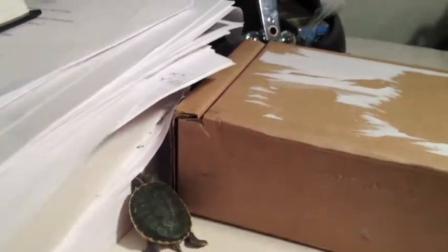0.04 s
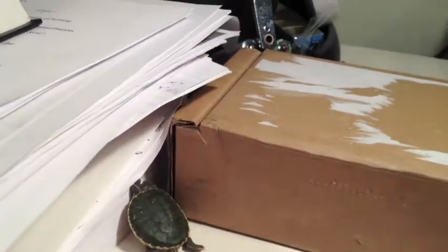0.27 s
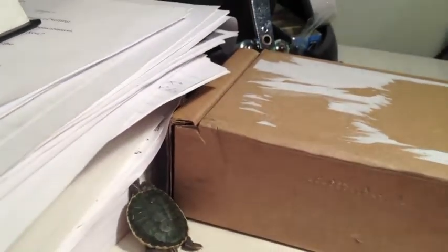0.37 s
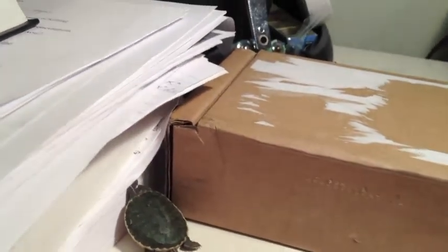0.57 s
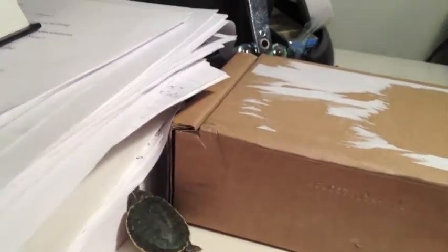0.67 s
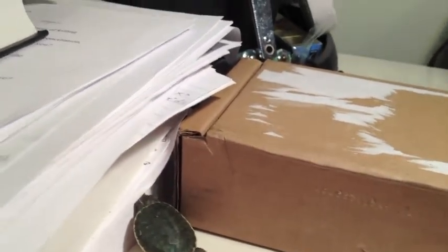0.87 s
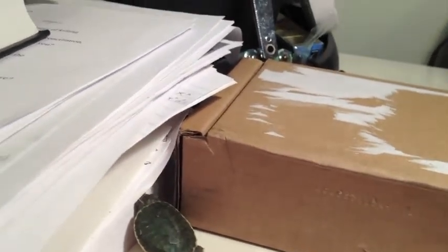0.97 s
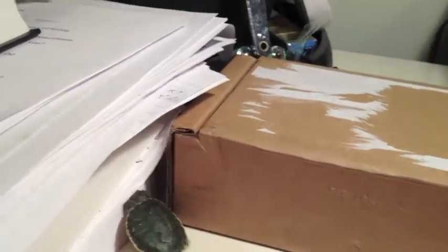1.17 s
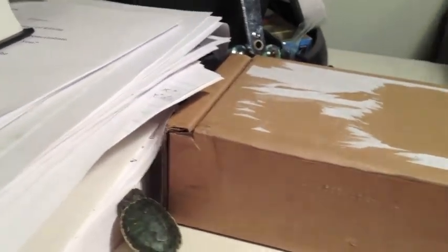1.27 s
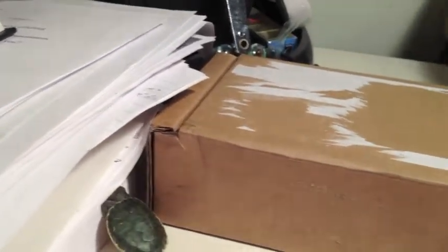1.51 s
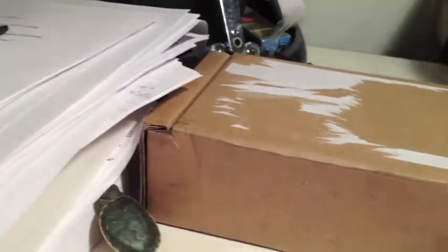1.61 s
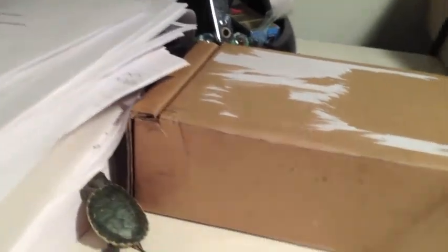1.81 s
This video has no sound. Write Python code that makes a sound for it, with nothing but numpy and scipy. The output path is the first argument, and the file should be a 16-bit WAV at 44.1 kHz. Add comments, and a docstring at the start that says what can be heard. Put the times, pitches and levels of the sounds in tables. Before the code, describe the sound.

A small turtle's shell knocks hollowly against a cardboard box and table, close by. After a brief paper rustle, quick knocks start at 0.2 seconds and tumble into a dull clatter with claw clicks and more rustling until about 0.6. From 0.8 a soft, gritty scrape swells, with light taps around 1.5 and a last bump near 1.75, over faint room air.

```python
"""A small turtle clambers between a cardboard box and a stack of paper on a table, close by in a small room.
Paper rustles first, a hiss full of tiny slips, over faint room air. The shell knocks three times, then
tumbles in a dull clatter that rings box and table, with dry claw taps and more rustle. A soft scrape
creeps in and swells under a few more taps until a last bump."""
import sys
import numpy as np
from scipy import signal
from scipy.fft import rfft, irfft
from scipy.io import wavfile

SR = 44100
rng = np.random.default_rng(int(sys.argv[2]) if len(sys.argv) > 2 else 0)


def transcribe(u):
    """Save the signal u as a 16-bit wav file named by the first command-line argument.

    u: samples, shape (n,) or (channels, n), limited to [-1, 1]; the rate is SR.
    q: integer samples, one column per channel.
    """
    v = np.clip(np.atleast_2d(u).T, -1, 1)
    q = np.round(v * 32767).astype(np.int16)
    wavfile.write(sys.argv[1], SR, q)


N = 81585


def undb(db):
    return 10 ** (np.asarray(db) / 20)


def unit_rms(x):
    return x / np.sqrt(np.mean(x ** 2) + 1e-20)


def curve_at(hz, points):
    """Read (f/Hz, value) breakpoints on a log-frequency axis."""
    freqs, values = np.array(points, float).T
    return np.interp(np.log(np.maximum(hz, 1)), np.log(freqs), values)


def equalise(x, eq):
    """Apply an EQ curve with a low cut below its first point, and normalise."""
    hz = np.arange(N // 2 + 1) * SR / N
    low_cut = np.minimum(hz / eq[0][0], 1) ** 2
    return unit_rms(irfft(rfft(x) * undb(curve_at(hz, eq)) * low_cut, N))


def decay(t, t60):
    """Exponential tail, 60 dB down at t60."""
    return np.exp(-np.log(1000) * t / t60)


def mix_in(out, start, x):
    i = int(start * SR)
    out[i:i + len(x)] += x[:N - i]


def fine_resonances(depth_db=7, spacing_hz=22.39):
    """An object's fine resonances: random peaks and dips in dB, one value per Hz."""
    return depth_db * np.interp(np.arange(SR // 2 + 1) / spacing_hz, np.arange(N), rng.standard_normal(N))


def box_hollowness(boost_db=4, width_hz=25):
    """Rubbing sounds the modes of box and table: a peak in dB at each, one value per Hz."""
    hz = np.arange(SR // 2 + 1)
    peaks = [1 / (1 + (2 * (hz - mode[0]) / width_hz) ** 2) for mode in BOX_TABLE_MODES]
    return boost_db * np.max(peaks, axis=0)


def friction(envelope, eq, grain_db, spread_db, grains_per_s=1500, catches_per_s=70):
    """Tiny slips of uneven size over a smooth hiss; louder and brighter with the pressure of the rub."""
    chance, size = rng.random(N), rng.exponential(size=N)
    direction, hiss = rng.standard_normal((2, N))
    grains = (chance < grains_per_s / SR) * np.sign(direction) * undb(spread_db * np.minimum(size, 3))
    texture = hiss + undb(grain_db) * unit_rms(grains)
    t = np.arange(N) / SR
    times, levels_db = np.array(envelope).T
    catch_db = np.interp(t * catches_per_s, np.arange(N), rng.standard_normal(N))  # catches and lets go
    pressure_db = np.interp(t, times, levels_db) + catch_db
    hz = np.arange(N // 2 + 1) * SR // N
    resonance_db = (0.35 * fine_resonances() + box_hollowness())[hz]
    rub = equalise(irfft(rfft(texture) * undb(resonance_db), N), eq)
    treble = irfft(rfft(rub) * (1 - np.exp(-(hz / 5960) ** 2)), N)
    treble_gain = undb(0.31 * (pressure_db - levels_db.max()))  # a lighter rub loses its top first
    return (rub - treble + treble * treble_gain) * undb(pressure_db)


# Envelope of the rub on paper: t/s, level/dB
PAPER_ENVELOPE = [(0, -43), (.065, -42.5), (.1, -51.5), (.118, -51), (.14, -61), (.2, -59.5), (.36, -73.5),
                  (.4, -40), (.47, -40), (.51, -46), (.54, -59), (.61, -56), (.66, -77)]
# Tone of the paper: f/Hz, level/dB
PAPER_EQ = [(100, -17), (160, -4), (800, 2.5), (1200, -5), (2400, 3), (3400, -2), (4300, -10), (5800, -14),
            (8000, -5.5), (9800, -14), (15000, -23.5)]


def paper_rustle():
    """The turtle brushes the paper stack: two short swishes of fine, even grain."""
    return friction(PAPER_ENVELOPE, PAPER_EQ, grain_db=-5.5, spread_db=4.5)


# Tone of the room air: f/Hz, level/dB
AIR_EQ = [(60, -26), (140, 0.5), (300, 1.5), (450, -4.5), (1000, -17.5), (3000, -24), (10000, -29.5),
          (15000, -31)]


def room_air():
    """A faint, dark bed of steady noise."""
    return undb(-62) * equalise(rng.standard_normal(N), AIR_EQ)


# Tone of the dense ring of cardboard and room: f/Hz, level/dB
CARDBOARD_EQ = [(110, -37.5), (150, -13.5), (400, -3), (800, -5.5), (1100, -12.5), (2000, -7.5),
                (3200, -6.5), (4200, -10), (5800, -17), (8400, -5.5), (9600, -19), (15000, -18)]
# Length of its tail: f/Hz, t60/s
CARDBOARD_T60 = [(150, 0.28), (700, 0.21), (2000, 0.2), (4500, 0.1), (8000, 0.054), (14000, 0.034)]


def cardboard_ring(t, strike_eq, resonance_db, attack_s=0.00024):
    """A crack of contact, then countless weak resonances excited at random; the high ones die first."""
    edges = np.geomspace(90, 16000, 17)
    hz = np.arange(len(t) // 2 + 1) * SR / len(t)
    tone = undb(curve_at(hz, CARDBOARD_EQ)) * (hz < edges[-1])
    tone = tone / np.linalg.norm(tone) * undb(curve_at(hz, strike_eq))
    spectrum = np.exp(2j * np.pi * rng.random(len(hz))) * tone * undb(resonance_db[hz.astype(int)])
    crack = undb(-9) * decay(t, t60=0.017)
    room_tail = undb(-29.5) * decay(t, t60=0.4)
    out = 0
    for lo, hi in zip(edges, edges[1:]):
        in_band = (hz >= lo) & (hz < hi)
        envelope = decay(t, curve_at(np.sqrt(lo * hi), CARDBOARD_T60)) + crack + room_tail
        band = irfft(spectrum * in_band, len(t)) * envelope
        out += band * np.linalg.norm(tone[in_band]) * np.linalg.norm(envelope) / np.linalg.norm(band)
    return out * (1 - np.exp(-t / attack_s))


def struck_mode(t, hz, t60, attack_cycles=1.6):
    """One mode: it builds over a few cycles, so low ones bloom late, then dies away."""
    return np.sin(2 * np.pi * hz * t) * (1 - np.exp(-t * hz / attack_cycles)) * decay(t, t60)


# Modes of box and table: f/Hz, level struck on the box side/dB, level struck on the table/dB, t60/s
BOX_TABLE_MODES = [(149.8, -0.5, -8.5, 0.16), (215.8, -14, -14, 0.53), (275.4, -12, -2.5, 0.2),
                   (296.7, 5, -15.5, 0.19), (439, -9, -11, .16), (388, -22, -14, 0.36),
                   (479.6, -5.5, 0.5, 0.18), (576.5, 1, -5.5, 0.15), (758.4, 4.5, -0.5, 0.11),
                   (787, -2.5, -17.5, 0.19), (821, -5.5, -8, 0.19), (1094, -19.5, -15.5, 0.27),
                   (1324, -9, -20, 0.16), (1380, -14, -11.5, 0.29), (1611, -15, -19, 0.23),
                   (1850, -19, -19, 0.15), (2157, -7, -25.5, .22), (2320, -10, -16.5, .11),
                   (2374, 4.5, -10, .13), (2549, -5, -9, 0.12), (3256, 0, -8.5, 0.092)]


def box_and_table(t, strike_eq, place):
    """The pitched body of a knock: shared modes, balanced by where the blow lands."""
    scatter_db = 2 * rng.standard_normal(len(BOX_TABLE_MODES))  # no two blows weight the modes alike
    out = 0
    for chance_db, (hz, box_db, table_db, t60) in zip(scatter_db, BOX_TABLE_MODES):
        place_db = np.interp(place, [0, 1], [box_db, table_db])
        out += undb(place_db + curve_at(hz, strike_eq) + chance_db) * struck_mode(t, hz, t60)
    return out


# Shell hits: t/s, bass/dB, body/dB, crack/dB, snap/dB, place (0 box side, 1 table), struck spot f/Hz
SHELL_HITS = [(.2129, -19.5, -14.5, -16.5, -15, 0.035, 800), (.2265, -40, -23.5, -14.5, -54, 0.5, 554),
              (.2405, -32, -20, -38.5, -55, 0.21, 770), (.2738, -28, -17, -21, -22.5, 0.58, 735),
              (.3394, -24, -18, -21.5, -19.5, 0.79, 680), (.3915, -35.5, -25, -61, -50, 1, 830),
              (.4045, -27.5, -17.5, -83, -34.5, .95, 586), (.4850, -19.5, -15.5, -24, -65, 0.75, 765),
              (.4920, -20.5, -17.5, -22.5, -48.5, 0.61, 818), (.5085, -54, -14, -40.5, -55, 0.53, 764)]
# Centres of the bass, body, crack and snap bands: f/Hz
HIT_BANDS = [250, 700, 2200, 8000]


def shell_knocks():
    """Each blow rings box, table and the patch under the shell, which gives it a pitch of its own."""
    out, t = np.zeros(N), np.arange(SR // 2) / SR
    resonance_db = fine_resonances()
    for start, *band_db, place, spot_hz in SHELL_HITS:
        strike_eq = list(zip(HIT_BANDS, band_db))
        modes = box_and_table(t, strike_eq, place)
        spot = undb(curve_at(spot_hz, strike_eq) - 4) * struck_mode(t, spot_hz, t60=0.047)
        mix_in(out, start, modes + spot + cardboard_ring(t, strike_eq, resonance_db))
    return undb(-2.5) * out


# Taps and thuds of claws and shell: t/s, level/dB, f/Hz, t60/s
TAP_HITS = [(.3914, -9.5, 666, 0.016), (.3952, -15.5, 860, 0.014), (0.4239, -1, 1760, 0.0036),
            (.4250, -11, 3015, 0.0048), (.4738, -11.5, 1900, 0.0038), (.5110, -13.5, 514.6, 0.076),
            (1.4135, -31.5, 640, 0.024), (1.484, -39.5, 199, 0.099), (1.53, -31.5, 187, 0.049),
            (1.557, -12.5, 618, 0.012), (1.5571, -14, 2360, 0.0022), (1.562, -23.5, 199, 0.027),
            (1.6150, -35, 785, 0.16), (1.753, -20, 2280, 0.0049), (1.7542, -10, 716, 0.0043),
            (1.7586, -22, 197.5, 0.048)]


def dry_taps(attack_cycles=0.43):
    """A click and a damped tone, with a short scatter of reflections; low thuds have a duller click."""
    out, t = np.zeros(N), np.arange(SR // 4) / SR
    for start, db, hz, t60 in TAP_HITS:
        click, scatter = rng.standard_normal((2, len(t)))
        lowpass = signal.butter(2, min(7.7 * hz, SR / 4), fs=SR)
        click = undb(-19) * unit_rms(signal.lfilter(*lowpass, click)) * decay(t, 10 / max(hz, 1000))
        envelope = decay(t, t60) * (1 - np.exp(-t * hz / attack_cycles))
        tap = (np.sin(2 * np.pi * hz * t) + click) * envelope
        reflections = scatter * decay(t, t60=0.03) * (1 - np.exp(-t / 0.0064))
        wet = signal.fftconvolve(tap, reflections)[:len(t)]
        wet *= undb(-4.5) * np.linalg.norm(tap) / np.linalg.norm(wet)
        mix_in(out, start, undb(db) * (tap + wet))
    return out


# Envelope of the slide along table and box: t/s, level/dB
SCRAPE_ENVELOPE = [(.74, -83.5), (.81, -57), (.875, -52.5), (.96, -61.5), (1.06, -55.5), (1.25, -50.5),
                   (1.38, -53), (1.42, -50), (1.53, -45.5), (1.62, -41), (1.7, -46), (1.725, -47.5),
                   (1.75, -37), (1.775, -45.5), (1.81, -54.5), (1.85, -76)]
# Tone of the slide: f/Hz, level/dB
SCRAPE_EQ = [(115, -28), (160, -9.5), (230, -4), (330, -11.5), (450, -2.5), (600, 3.5), (780, -3),
             (980, -9.5), (1300, -9), (1750, -10.5), (2350, -10), (3000, -13), (4200, -16.5), (5600, -29),
             (6600, -23), (7800, -15.5), (9600, -27), (11700, -22.5), (15000, -32)]


def soft_scrape():
    """The turtle slides along table and box: a darker, grittier rub that swells to the last bump."""
    return friction(SCRAPE_ENVELOPE, SCRAPE_EQ, grain_db=-6, spread_db=8)


def scene():
    """Rubs and hits over room air, in mono."""
    rustle, scrape, air = paper_rustle(), soft_scrape(), room_air()
    return (rustle + air + shell_knocks() + dry_taps() + scrape)[None]


def record(dry):
    """The microphone drops the deep bass and cuts the top."""
    low_cut = signal.butter(4, 115, "high", fs=SR, output="sos")
    high_cut = signal.ellip(8, .2, 80, 15200, fs=SR, output="sos")
    return signal.sosfilt(high_cut, signal.sosfilt(low_cut, dry))


dry = scene()
out = record(dry)
transcribe(out)
```